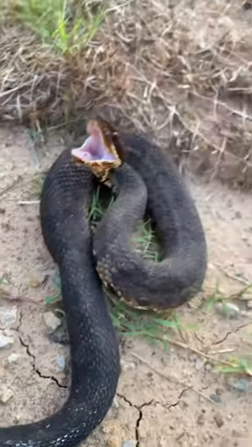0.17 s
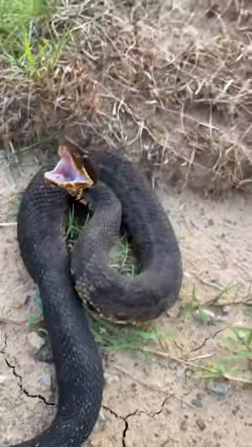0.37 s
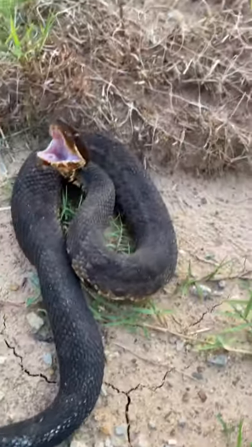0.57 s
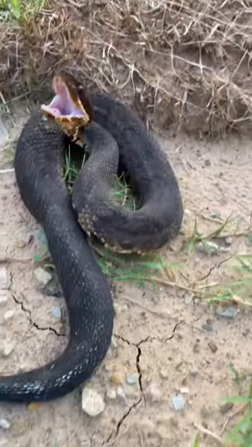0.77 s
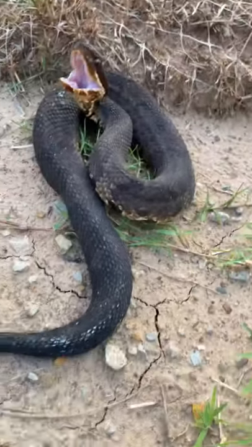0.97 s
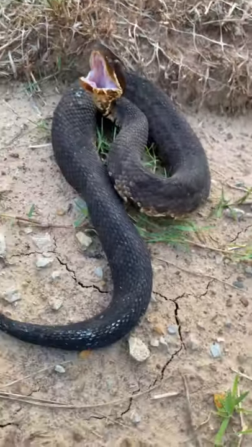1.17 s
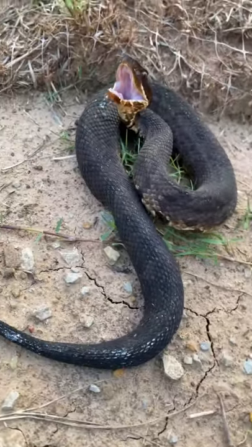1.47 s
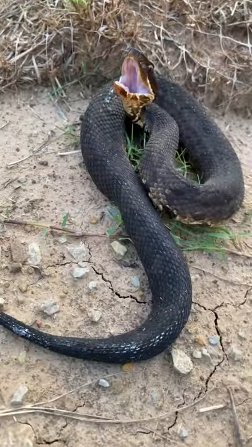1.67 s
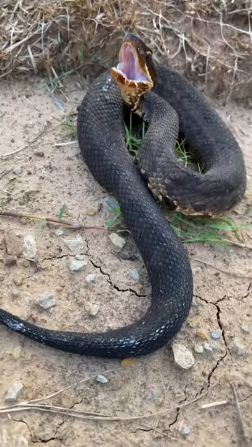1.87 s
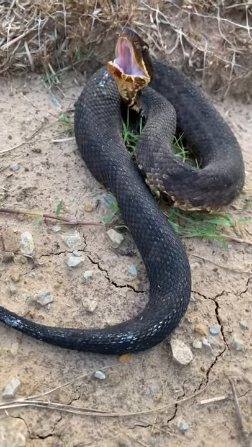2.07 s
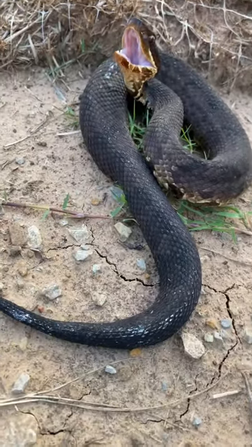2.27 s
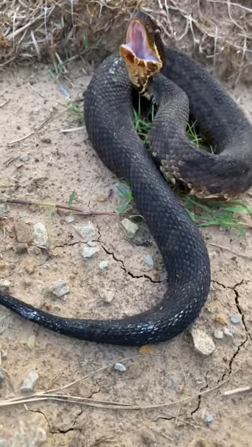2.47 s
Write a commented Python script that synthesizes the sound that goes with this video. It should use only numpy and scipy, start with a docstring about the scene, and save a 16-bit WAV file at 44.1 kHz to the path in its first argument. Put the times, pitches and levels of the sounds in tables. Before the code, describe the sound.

Continuous bright insect buzz from many far cicadas and one closer, heard outdoors on a hand-held phone with soft wind rumble; a short scuff and taps come first, then a faint bird calls regularly.

```python
"""A dry field in summer, heard by a hand-held phone. Shaped stereo noise makes light wind rumble on the microphones,
a far cicada chorus hissing all round, and open air; narrow noise bands are single far singers.
A nearer cicada buzzes in bursts of clicks that ring its drums. The hand scuffs and taps the case near the
left microphone: grains and pushes ringing resonances. Gliding sines make a few faint falling notes and a
distant bird's repeated two-note call."""
import sys
import numpy as np
from scipy import signal
from scipy.fft import rfft, irfft, next_fast_len
from scipy.io import wavfile
from scipy.ndimage import uniform_filter1d

SR = 44100
rng = np.random.default_rng(int(sys.argv[2]) if len(sys.argv) > 2 else 0)


def undo_db(level):
    """Turn decibels back into plain size, where 20 dB means ten times bigger."""
    steps = np.asarray(level, float) / 20
    return 10 ** steps


def persist_wave(psi):
    """Save psi, clipped to +-1, as 16-bit WAV."""
    counts = np.round(np.clip(psi, -1, 1) * 32767).astype(np.int16)
    wavfile.write(sys.argv[1], SR, np.atleast_2d(counts).T)


N = 115101
T = np.arange(N) / SR


def curve(rows, column=1):
    """Gain over time from a dB column."""
    rows = np.array(rows)
    return undo_db(np.interp(T, rows[:, 0], rows[:, column]))


def unit(x):
    """Scale to rms 1."""
    return x / np.sqrt(np.mean(x ** 2))


def ring(x, hz, width_hz):
    """One resonance, gain 1 at its centre."""
    return signal.lfilter(*signal.iirpeak(hz, hz / width_hz, SR), x)


def walk(rate):
    """Random levels held 1 / rate s and slewed twice; spread near 1."""
    hold = int(SR / rate)
    steps = np.repeat(rng.standard_normal(N // hold + 1), hold)
    return 1.32 * uniform_filter1d(uniform_filter1d(steps, hold), hold)[:N]


def lagged(x, rad):
    """Left and right copy, the right one later in phase by rad."""
    analytic = signal.hilbert(x, next_fast_len(N))[:N]
    return np.array([x, (analytic * np.exp(-1j * rad)).real])


def panned(db, pan_db):
    """Left and right gain, pan_db being left minus right."""
    return undo_db(db + np.array([[pan_db], [-pan_db]]) / 2)


def echoed(x, db):
    """The sound plus its scattered return from ground and brush, a decaying noise tail."""
    t60_s = 0.25
    tail = rng.standard_normal((2, SR // 4)) * undo_db(-60 * T[:SR // 4] / t60_s)
    tail = tail * undo_db(db) / np.sqrt(np.sum(tail ** 2, axis=1, keepdims=True))
    return x + signal.fftconvolve(x, tail, axes=1)[:, :N]


def field(rows, flicker_db, rate, swell_db):
    """Stereo noise in half-octave bands that flicker alone and swell together; left rms 1."""
    size = next_fast_len(N)
    hz = np.maximum(np.arange(size // 2 + 1) * SR / size, 1)
    rows = np.array(rows)
    db, tilt, like, lag = (np.interp(np.log(hz), np.log(rows[:, 0]), c) for c in rows.T[1:])
    like = np.clip(like, 0, 1)
    shared, own = rfft(rng.standard_normal((2, size)))
    # the right side mixes the lagged left noise with noise of its own
    right = like * shared * np.exp(-1j * lag) + np.sqrt(1 - like ** 2) * own
    pair = undo_db(db) * np.array([shared, undo_db(tilt) * right])
    out, swell = 0, walk(rate / 4)
    for centre in np.arange(np.log2(rows[0, 0]) - 1, np.log2(SR / 2) + 1, .5):
        band = np.clip(1 - 2 * abs(np.log2(hz) - centre), 0, 1)
        out = out + irfft(pair * band, size)[:, :N] * undo_db(flicker_db * walk(rate) + swell_db * swell)
    return out / np.sqrt(np.mean(out[0] ** 2))


def wind():
    """Light wind rumbling on the microphones: low noise, only partly alike left and right, in gusts."""
    # Each row: frequency in Hz, relative left level in dB per Hz, right minus left in dB,
    # likeness of the two sides 0-1, phase by which the right lags in radians.
    wind_field = [(14.82, -53, 2, 0.5, .3), (27.2, -17, -8, 0, 0.32), (49.7, -2.5, -0.5, 0.45, 0.22),
                  (76, 0.5, -1, 0.53, 1.12), (119.5, -2.5, -1.5, 0.64, 0.15),
                  (172, -8.5, -2.5, 0.62, 0.079), (241.2, -12.5, -2, 0.8, 0.052), (259, -18, -8, 1, .1),
                  (424, -27.5, -4.5, 0, 0.28), (605, -39, -1.5, 0.04, .2), (1130, -58, 3, 0.2, 0.15)]
    # Gusts. Each row: time in seconds, level in dB before the 3 dB lift below.
    gusts = [(0.0, -55.5), (0.07, -52), (0.22, -56), (0.25, -50), (0.52, -55), (1.87, -53), (2.1, -54.5),
             (2.12, -50), (2.38, -53.5), (2.41, -47), (2.54, -55.5), (2.61, -52.5)]
    return field(wind_field, flicker_db=2.0, rate=12.27, swell_db=-1.17) * curve(gusts) * undo_db(3.0)


def chorus():
    """Many far cicadas blurred into a steady hiss: noise strongest from about 3 to 8 kHz."""
    # Each row: frequency in Hz, relative left level in dB per Hz, right minus left in dB,
    # likeness of the two sides 0-1, phase by which the right lags in radians.
    chorus_field = [(1000, -71, -4, 0.56, 18), (1380, -40, 1, 0.79, 9.5), (2160, -31.5, -2, 0.55, 1.5),
                    (2663, -15, -3, 0.34, 0), (3067, -6, 5, 0.16, 0.6), (3650, -3, 6, 0.066, -2.8),
                    (4040, -3.5, 3.5, 0.55, -0.5), (4500, 1.5, 2, 0.21, 3), (5270, -1.5, 2, 0.3, -0.3),
                    (5800, 0, 0, 0.83, 1.06), (6900, -2.5, -0.5, 1, 0.86), (8080, -3.5, -1, 1, 1.9),
                    (7780, -7.5, 0.3, 0.87, 1.18), (9400, -12, -1, 1, 1.5), (9500, -16, -12, 0.8, 4),
                    (9650, -25, -5, 0.82, 2), (12200, -61, -5, 0.63, 13)]
    # Loudness of the hiss. Each row: time in seconds, left rms level in dB.
    chorus_level = [(0, -52.5), (.3, -51.5), (.6, -51.5), (1.3, -52.5), (1.9, -52.5), (2.61, -51)]
    return field(chorus_field, flicker_db=0.3, rate=9.97, swell_db=.5) * curve(chorus_level)


def singers():
    """Single far cicadas that stand out of the chorus, each a narrow wavering noise band."""
    # Each row: centre in Hz, width in Hz, level in dB, left minus right in dB.
    singer_bands = [(3494, 79, -70.5, -2.5), (3718, 60, -69, 2), (4400, 44, -69, 3), (4800, 26, -70, 4.5),
                    (5710, 200, -73, 1.5), (6460, 77, -71, -1)]
    out = 0
    for hz, width, db, pan_db in singer_bands:
        band = ring(rng.standard_normal((2, N)), hz, width) * np.sqrt(SR / np.pi / width)  # rms near 1
        out = out + band * panned(db, pan_db) * undo_db(3.0 * walk(5.0))
    return out


def air():
    """Open air: faint broad noise under everything."""
    # Each row: frequency in Hz, relative left level in dB per Hz, right minus left in dB,
    # likeness of the two sides 0-1, phase by which the right lags in radians.
    air_field = [(287, -6.5, -2, 0.088, 6), (602, -6.5, -0.7, 1, 3.12), (1080, -10, -2.1, 0.96, 2.34),
                 (1440, -17.5, 0, 0.34, 2.17), (2700, -11.5, 0.7, 0.25, 0.79), (9200, -19, -7, 0.39, 5.25),
                 (11200, -11.5, 4, 0.56, 2.7), (11600, -14, -5.5, 0.9, 2.83), (13000, -12, -2, 0.86, 2.9),
                 (14800, -13, 5, 1, 4), (16300, -56, -15, .95, 1.5)]
    # Loudness of the air. Each row: time in seconds, left rms level in dB.
    air_level = [(0, -64), (.3, -62), (.5, -66.5), (.7, -64.5), (1.0, -65.5), (1.3, -68.5), (1.55, -65),
                 (1.8, -77), (2.1, -72), (2.61, -65.5)]
    return field(air_field, flicker_db=.8, rate=14, swell_db=.2) * curve(air_level)


def cicada():
    """Two drums take turns, a burst each; rough clicks ring the drum and spit a bright rib band."""
    # Each row: time in seconds, ringing drum level in dB, bright rib clicks level in dB, before the echo.
    buzz_level = [(0, -57, -60), (.2, -60.5, -68), (.5, -62, -72), (.9, -66, -65), (1.3, -62, -71),
                  (1.6, -62, -68), (1.85, -63.5, -57.5), (2.2, -58, -57.5), (2.61, -63.5, -58.5)]
    burst_hz, burst_peak_s, burst_sharp = 37.0, .0022, 1.5
    click_hz, click_peak_s, click_decay_s = 377.6, .0001, .0011
    drum_hz, drum_width_hz, drum_wander_hz, drum_rough = 6810, 400, 70, .8
    turns = burst_hz * (T - burst_peak_s) + .5
    burst = np.sin(np.pi * turns) ** 2
    # the clicks of the two drums lie half a period apart
    since_click = ((T - click_peak_s) * click_hz + np.floor(turns) / 2) % 1 / click_hz
    shape = burst ** burst_sharp * np.exp(-since_click / click_decay_s)
    clicks = shape * rng.standard_normal((2, N))

    pitch = drum_hz + drum_wander_hz * walk(burst_hz)
    tone = shape * np.cos(2 * np.pi * np.cumsum(pitch) / SR)
    strike = unit(ring(tone, drum_hz, drum_width_hz)) * undo_db(2.0 * walk(burst_hz))
    rough = unit(ring(ring(clicks[0], drum_hz, drum_width_hz), drum_hz, 1800))
    drum = unit(strike + drum_rough * rough) * curve(buzz_level)

    bright = signal.butter(5, [5820, 8810], "band", fs=SR, output="sos")
    ribs = unit(signal.sosfilt(bright, clicks[1])) * curve(buzz_level, column=2)
    return echoed(lagged(drum, 1.51) + lagged(ribs, 1.76), -9)


def stick_slip():
    """Skin catching and letting go: sparse grains of random sign and uneven height."""
    grains_per_s, scatter_db = 4000, 1.6
    chance = rng.random((2, N))
    height = undo_db(-scatter_db * np.log(chance[1] + 1e-9))
    return (chance[0] < grains_per_s / SR) * height * rng.choice([-1, 1], N)


def skin_rasp(grains):
    """The brighter side of the rubbing: grains, shifted in time, through a broad resonance; rms 1."""
    hz, width_hz = 2350, 1400
    return unit(ring(ring(np.roll(grains, 900), hz, width_hz), hz, width_hz))


def scuff(grains, rasp):
    """Grains ring the case, loud at the left port, faint and out of step at the right."""
    # The slide. Each row: time in seconds, level in dB of the left case ring before its low-pass.
    slide = [(0, -64.5), (.07, -65.5), (.1, -59), (.15, -60.5), (.205, -56), (.214, -43), (.24, -43.5),
             (.25, -48), (.262, -45), (.28, -52), (.3, -52), (.345, -49.5), (.362, -57), (.372, -57),
             (.41, -69), (.5, -74), (.8, -89), (2.61, -100)]
    # Case resonances. Each row: centre in Hz, width in Hz of the first of two passes, relative level in dB.
    case_modes = [(330, 300, -2), (488, 270, 1), (656, 175, 2), (854, 250, -0.5)]
    case = 0
    for hz, width, db in case_modes:
        case = case + undo_db(db) * unit(ring(ring(grains, hz, width), hz, 2 * width))
    skin_top = signal.butter(4, 1030, fs=SR, output="sos")
    case = signal.sosfilt(skin_top, unit(case))
    left = case + undo_db(-12) * np.roll(rasp, 400)
    right = undo_db(-13) * lagged(case, -2.5)[1] + undo_db(-17) * rasp
    return np.array([left, right]) * curve(slide)


def scrape(rasp):
    """Light steady drag of skin, heard at both ports, until it fades out."""
    level_db, end_s, fade_s = -71.5, 0.56, .15
    fade = np.clip((end_s - T) / fade_s, 0, 1)
    return undo_db(level_db + 2.0 * walk(30)) * fade * np.array([np.roll(rasp, 1700), np.roll(rasp, 1690)])


def taps():
    """Dry taps on the case: an impulse and a short noisy rattle ring one broad resonance."""
    # Each row: time in seconds, left peak level in dB, ring in Hz (dull pad or bright nail).
    tap_rows = [(0.08, -51, 2080), (.1, -56, 796), (0.231, -53, 1700), (.352, -50, 2000), (0.778, -68, 840),
                (0.951, -68, 840), (1.454, -53, 760)]
    width_share, right_db, rattle_gain, rattle_t60_s = .65, -4, .06, .05
    out = np.zeros(N)
    for s, db, hz in tap_rows:
        decay = (T > s) * undo_db(-60 * abs(T - s) / rattle_t60_s)
        push = signal.unit_impulse(N, int(s * SR)) + rattle_gain * decay * rng.standard_normal(N)
        shape = ring(ring(push, hz, width_share * hz), hz, width_share * hz)
        out = out - undo_db(db) * shape / abs(shape).max()
    return np.array([out, undo_db(right_db) * out])


def hand():
    """The hand on the case: scuff and scrape share the same grains, taps come on top."""
    grains = stick_slip()
    rasp = skin_rasp(grains)
    return scuff(grains, rasp) + scrape(rasp) + taps()


def note(start, length, from_hz, to_hz, bend, db, pan_db):
    """A gliding, slightly unsteady sine with soft ends."""
    u = np.clip((T - start) / length, 0, 1)
    pitch = from_hz + (to_hz - from_hz) * u ** bend + 28 * walk(120)  # wanders by about 28 Hz
    tone = np.sin(2 * np.pi * np.cumsum(pitch) / SR)
    return np.sqrt(2 * np.sin(np.pi * u) + 1e-12) * tone * panned(db, pan_db)


def from_afar(calls):
    """Calls roughened by the long way through moving air, with their echo."""
    return echoed(calls * undo_db(0.96 * walk(150)), -5.5)


def falling_notes():
    """Faint short falling notes, to the right: whistles near 1700 Hz and two higher notes."""
    # Each row: start in seconds, length in seconds, first pitch in Hz, last pitch in Hz, level in dB.
    note_rows = [(0, 0.031, 2420, 2336, -80), (.008, 0.057, 1760, 1640, -74),
                 (0.31, 0.065, 2150, 2050, -71), (0.385, 0.055, 1750, 1640, -74)]
    return from_afar(sum(note(s, length, from_hz, to_hz, 1.05, db, -10)
                         for s, length, from_hz, to_hz, db in note_rows))


def bird():
    """A distant bird's two-note call: a steep chip, then a falling whistle."""
    # Each row: start of the call in seconds, whistle level in dB.
    bird_calls = [(.745, -79), (1.085, -76), (1.447, -76.5), (1.818, -75.5), (2.163, -74.5), (2.525, -76)]
    chip_s, chip_from_hz, chip_to_hz, chip_db, chip_pan_db = .03, 2950, 1980, -2.5, -3
    whistle_after_s, whistle_s, whistle_top_hz, whistle_end_hz, whistle_pan_db = .045, .075, 1810, 1520, 4
    calls = 0
    for s, db in bird_calls:
        chip = note(s, chip_s, chip_from_hz, chip_to_hz, 0.833, db + chip_db, chip_pan_db)
        whistle = note(s + whistle_after_s, whistle_s, whistle_top_hz, whistle_end_hz, 1.87, db, whistle_pan_db)
        calls = calls + chip + whistle
    return from_afar(calls)


def scene():
    """Wind, chorus and open air behind the cicada, the hand, the falling notes and the bird."""
    return wind() + chorus() + singers() + air() + cicada() + hand() + falling_notes() + bird()


def band_limit(x):
    """A steep low-pass at the top of the band."""
    return signal.sosfilt(signal.butter(12, 15700, fs=SR, output="sos"), x)


def record(dry):
    """The finished mix as the phone delivers it."""
    return band_limit(dry)


dry = scene()
out = record(dry)
persist_wave(out)
```